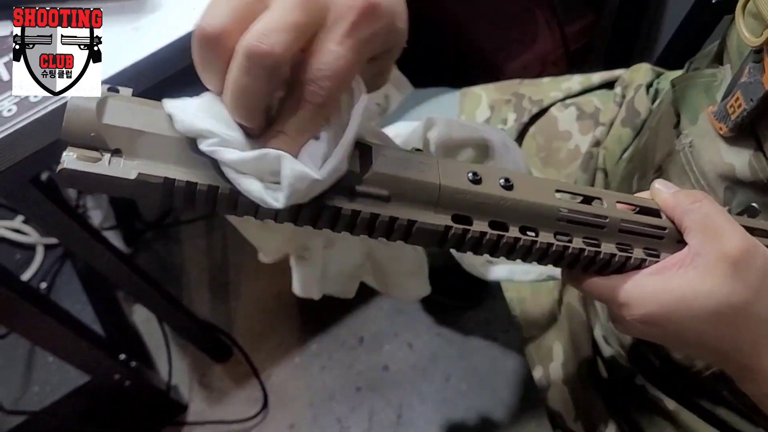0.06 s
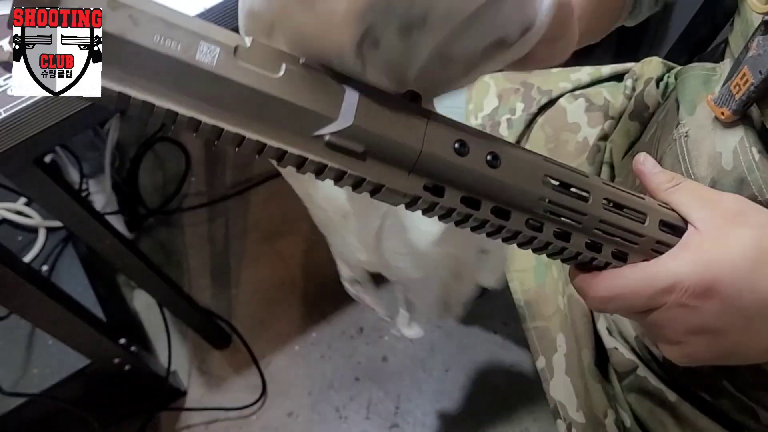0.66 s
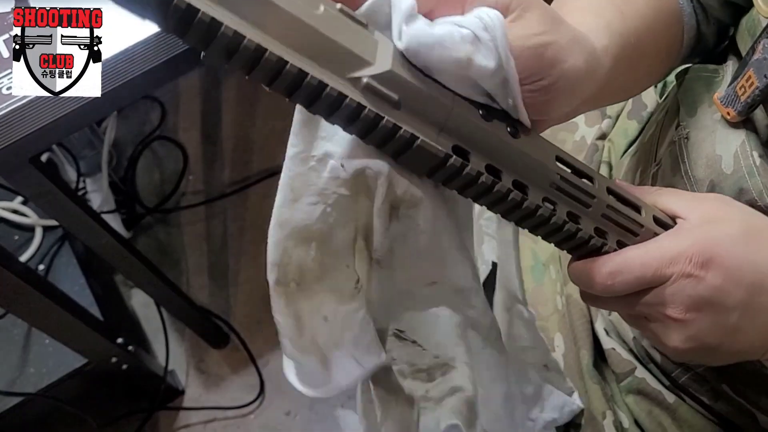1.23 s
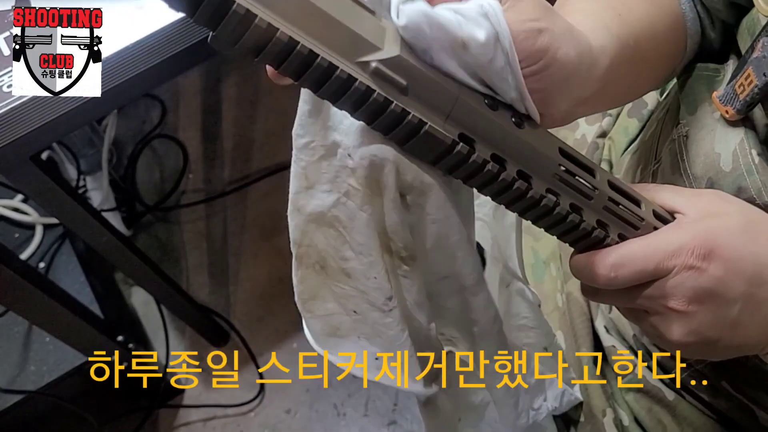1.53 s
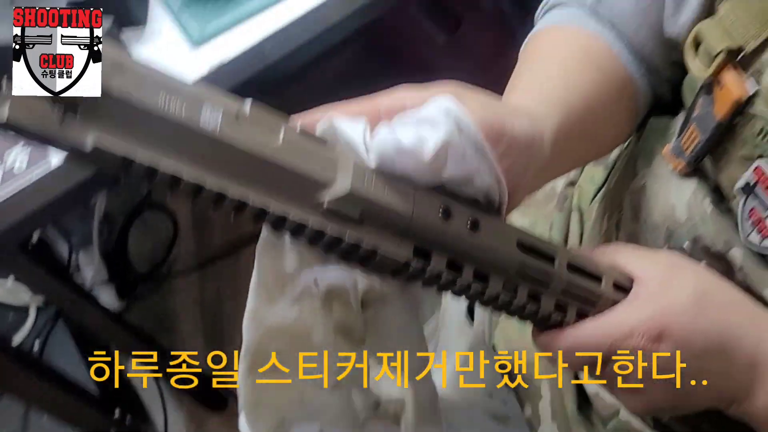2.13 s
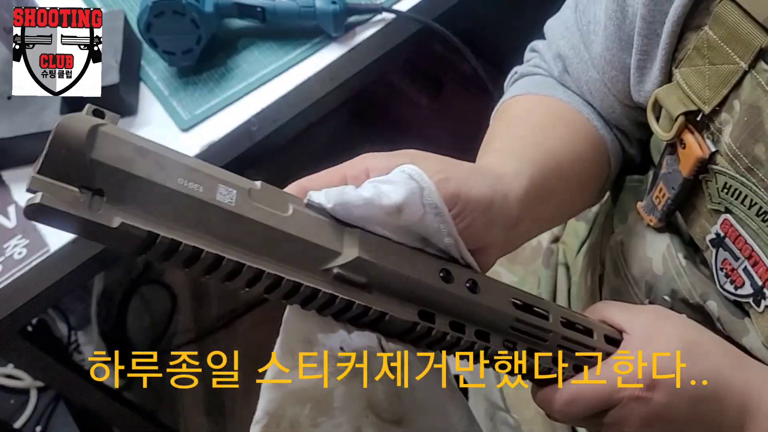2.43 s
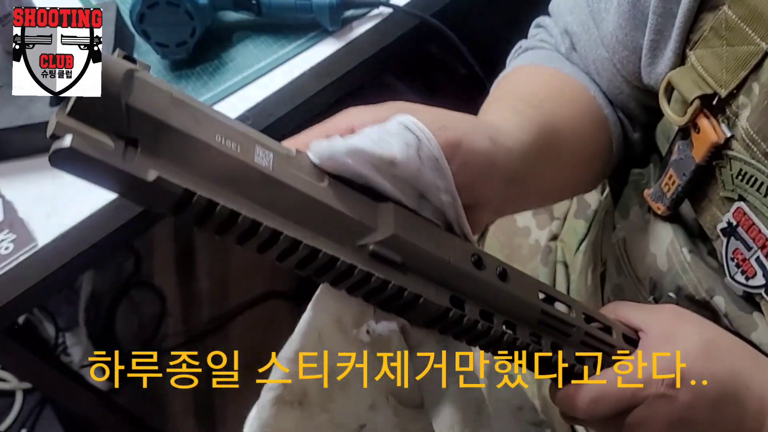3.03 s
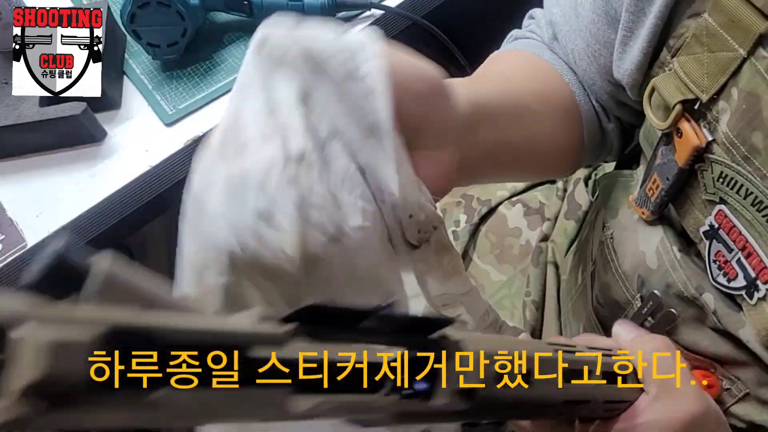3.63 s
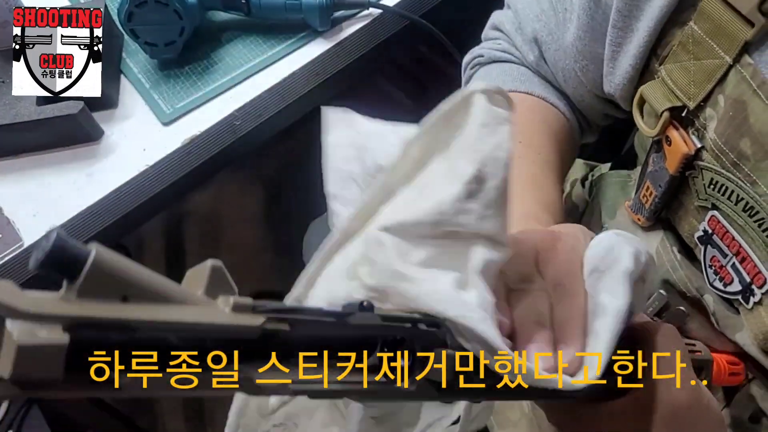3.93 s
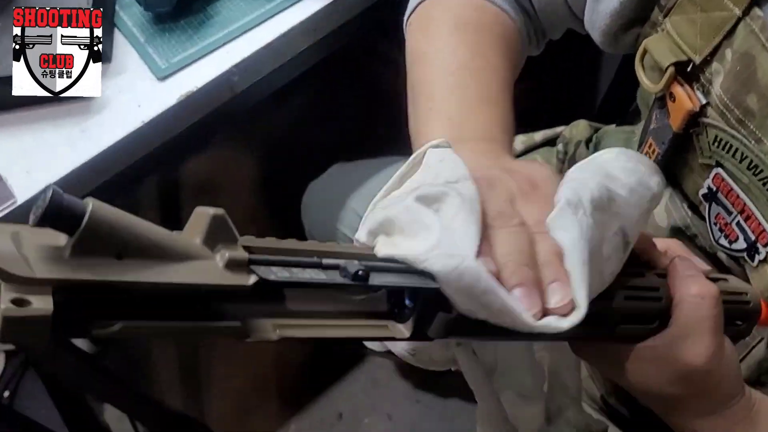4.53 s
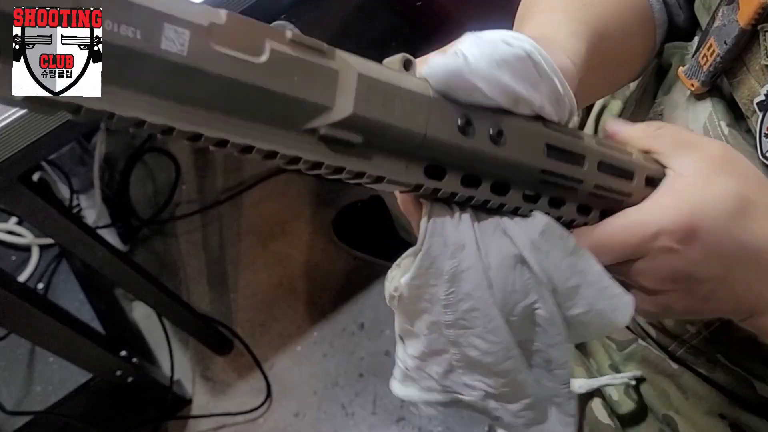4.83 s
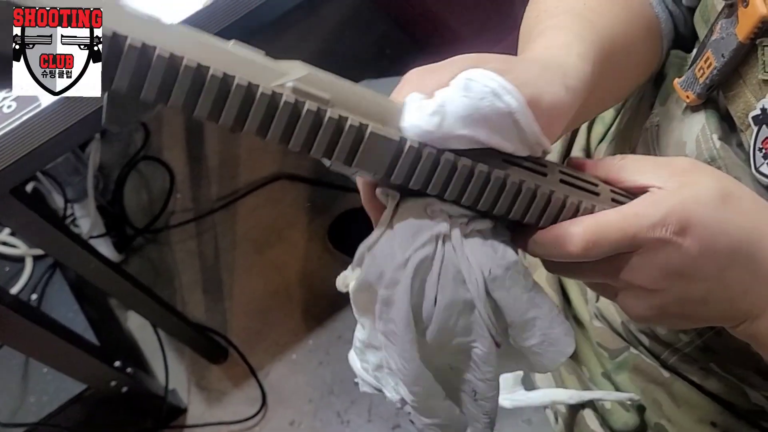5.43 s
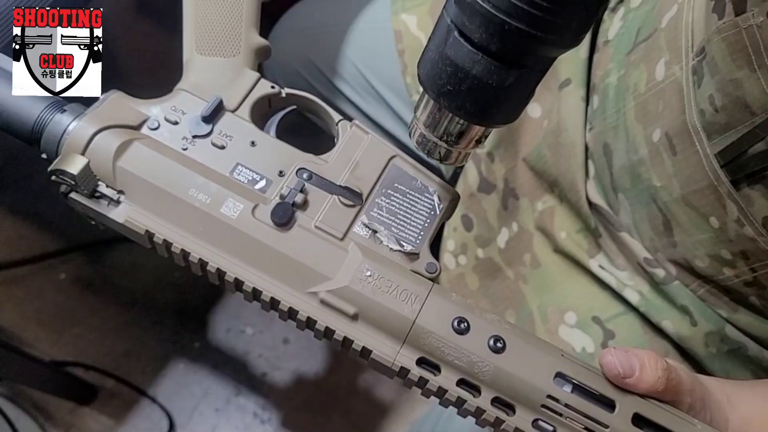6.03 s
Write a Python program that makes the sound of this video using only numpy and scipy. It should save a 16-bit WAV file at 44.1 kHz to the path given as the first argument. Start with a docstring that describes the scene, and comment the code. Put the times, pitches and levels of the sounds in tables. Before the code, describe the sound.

A cloth rubs over a metal rifle rail with clicks and knocks, then a heat gun suddenly starts blowing.

```python
"""Wiping a rifle, then a heat gun

A small, humming workshop, a stereo microphone close to the rifle. A cloth hisses along the metal
rail stroke by stroke, and its friction rings the hollow handguard near 2 kHz. Loose parts click
and knock as the rifle is turned. Then the wiping stops abruptly and a heat gun is blowing on it."""
import sys
import numpy as np
from scipy import signal
from scipy.fft import rfft, irfft, next_fast_len
from scipy.io import wavfile
from scipy.ndimage import uniform_filter1d, map_coordinates

SR = 44100
rng = np.random.default_rng(int(sys.argv[2]) if len(sys.argv) > 2 else 0)


def pcm_store(signal):
    """Save signal as 16-bit PCM."""
    levels = np.round(np.clip(np.atleast_2d(signal), -1, 1) * 32767)
    wavfile.write(sys.argv[1], SR, levels.astype(np.int16).T)


N = 276066
GUN_START_S = 5.752

# strokes of the cloth: start t/s, end t/s, hiss level/dB, scrape offset/dB, ring offset/dB
STROKES = [(0, 0.105, -46.5, -8.5, -24), (0.109, 0.208, -48, -4.5, -26), (0.211, 0.338, -46, -11, -25),
           (0.3, 0.586, -79.5, 1, -5), (0.651, 0.95, -58.5, -2, -3.5), (0.967, 1.089, -63, 0, 0),
           (1.16, 1.216, -58.5, -5, -14), (1.272, 1.354, -61.5, -4, -5), (1.395, 1.503, -63, -4, -8),
           (1.501, 1.618, -54.5, -5.5, -11), (2.269, 2.45, -54.5, -1, -19), (2.472, 2.578, -63, -2, -12),
           (2.724, 2.93, -66, 0.5, -8), (3.33, 3.571, -70, -10.5, 6), (3.566, 3.665, -64.5, 4, -7),
           (3.803, 4.057, -55.5, -8.5, -17), (4.076, 4.217, -55, -4, -22), (4.212, 4.364, -55, -7, -28),
           (4.381, 4.515, -59, -0.5, -8), (4.519, 4.644, -57.5, -7.5, -23), (4.661, 4.8, -54, -8, -15),
           (4.802, 4.928, -59, -1.5, -10), (4.924, 5.082, -60, -10, -7), (5.265, 5.564, -64, 4, -19),
           (5.497, 5.763, -55, -9.5, -36)]
# how firmly the hand works the cloth: t/s, level/dB
EFFORT = [(0.0, -70.5), (0.37, -64), (0.59, -69), (0.73, -71.5), (0.93, -65), (1.1, -65.5), (1.73, -69),
          (2.86, -69), (3.2, -65.5), (3.61, -70), (4.72, -66.5), (4.89, -64), (5.5, -67.5), (5.74, -68)]
# spectra of the cloth's hissing fibres, lower scrape and rustling folds: f/Hz, level/dB
FIBRES = [(1000, -29), (3000, -7), (5500, -1), (9000, 1.5), (12000, 0), (14500, 0.5), (16000, -0.5)]
SCRAPE = [(600, -21), (1400, -1), (2400, -5), (3400, -5), (4800, -8), (7000, -16.5), (12000, -25)]
FOLDS = [(200, -18), (400, 0), (700, 3.5), (1200, -2), (2500, -9), (6000, -19.5)]
# modes of the hollow handguard: f/Hz, level/dB, t60/s
HANDGUARD_MODES = [(2032, 1, 0.1), (2090, -37, 0.76), (1880, -8, 0.06), (2060, -18, .07),
                   (2064, -9.5, 0.12), (2260, -7, 0.038), (2580, -18, .07), (3660, -22, 0.079),
                   (5000, -25, 0.055), (7500, -23.5, .04)]
# likeness of left and right at the microphone, for rifle and room: f/Hz, correlation
NEAR_ALIKE = [(60, 0.79), (130, 0.8), (290, 0.34), (640, -0.27), (1410, -0.55), (3100, -0.063),
              (6820, -0.018), (15000, -0.01)]
# spectra of muffled handling and of the workshop's room tone: f/Hz, level/dB
HANDLING = [(60, -17), (150, 2), (300, -2.5), (500, -10), (900, -14.5), (2000, -40.5)]
ROOM_TONE = [(12, -27.5), (22, -4.5), (28, -2.5), (40, -4), (60, -5), (120, -5), (187, -22), (250, -9),
             (340, -10.5), (434, -25.5), (1300, -28), (4400, -42), (8900, -55), (16000, -64)]
# the workshop's hum above its deepest tone: f/Hz, level/dB
HUM = [(118.4, -66.5), (240.3, -64.5)]
# metal contacts: t/s, level/dB, hardness (0 is medium), rattle and knock t60/s,
# loose part's resonance f/Hz, its height/dB, ring offset/dB, knock offset/dB
CONTACTS = [(0.267, -42.5, 0.3, 0.25, 3630, 3.7, -12, -25), (0.769, -56.5, -0.53, 0.058, 2000, 11, 14, 1),
            (0.803, -55, -0.049, 0.061, 2800, 3, -15, -3), (0.86, -50.5, -0.74, 0.073, 1930, 27, -7, -1.5),
            (0.9171, -22.5, 0.71, 0.093, 2100, 19, 0.5, -24.5),
            (0.951, -40.5, 0.11, 0.099, 1250, 24, -6, -10),
            (1.5777, -31.5, -0.059, 0.04, 3830, 15, -10.5, -27),
            (2.074, -50.5, 0.71, 0.12, 10360, 18, -24, -16),
            (2.547, -34, 0.16, 0.23, 2620, 4.5, -21, -28.5), (2.558, -39, 0.83, 0.13, 8900, 18, -25, -19.5),
            (2.894, -51.5, 0.29, 0.1, 1750, 24.5, 0.5, -15), (2.972, -52, -0.23, 0.75, 4070, 9, -20, -13),
            (3.015, -24.5, -0.11, 0.27, 3700, 7.8, -17, -12), (3.028, -27, 0.2, 0.092, 1860, 9.6, -20, -9),
            (3.14, -50, -0.57, 0.38, 2350, 4, 6, -8.5), (3.288, -14, 0.86, 0.12, 10570, 9, 2.5, -29),
            (3.3039, -34.5, 0.31, 0.3, 2510, 15, -7, -31), (3.632, -67.5, -0.4, 0.04, 2070, 9.5, 12.5, -11),
            (3.822, -32.5, 0.35, 0.085, 2310, 25, -2.5, -16), (3.872, -48, -0.5, 0.045, 2260, 28, 1, -18),
            (4.162, -28, 0.28, 0.093, 4980, 9.2, -7.5, -20), (4.195, -48.5, -1, 0.095, 1250, 6, -5, -0.5),
            (4.387, -52.5, -1.3, 0.034, 1310, 31, -13, 3), (4.773, -46.5, -0.2, 0.051, 5970, 12, 1, -7),
            (4.804, -43, -0.7, 0.045, 2430, 17.5, -9, -11), (4.868, -53.5, -0.18, 0.1, 5950, 18, 5, 6.5),
            (5.277, -57, -1, 0.04, 1205, 10, 0, 3)]
# spectra of a contact's crack, rattle and dull knock: f/Hz, level/dB
CRACK = [(500, -22), (1200, 5.5), (2500, 2), (4000, -15), (6000, 1.5), (10000, 6.5), (12500, 10),
         (14500, -9), (16000, -17)]
RATTLE = [(800, -14), (1600, -1), (2700, 1.5), (3700, -0.5), (6000, -3.5), (9000, -8), (12000, -12),
          (14500, -6), (16000, -10.5)]
KNOCK = [(150, -28), (350, -3), (600, 3), (1250, -6.5), (1850, -8), (3500, -18.5)]
# reverberation of the workshop: f/Hz, t60/s
ROOM_DECAY = [(300, .3), (2500, 0.16), (7000, 0.14), (15000, 0.073)]
# spectrum of the heat gun's rushing air: f/Hz, level/dB
AIRFLOW = [(18, -45), (30, -14), (59, -11), (148, -20), (230, -12.5), (432, -17), (691, -5.5), (787, -12.5),
           (996, -8), (1510, -14.5), (1770, -4.5), (2020, -10), (2360, -13.5), (5310, -17.5), (15500, -26)]
# resonances of its barrel and fan: f/Hz, width/Hz, level/dB
BARREL = [(686, 26, 8.5), (904, 63, -2), (988, 72, -0.5), (974, 42, -3), (1744, 33, 0), (1725, 38, -4),
          (1890, 67, -15), (2380, 120, -1), (2804, 88, -3.5), (3240, 53, -3.5), (3460, 65, -5),
          (4020, 86, -11.5), (6600, 180, -15.5), (8800, 250, -14.5), (14880, 300, -20.5)]
# likeness of left and right for the heat gun: f/Hz, correlation
GUN_ALIKE = [(60, 0.63), (130, 0.9), (290, 0.69), (640, 0.19), (1410, 0.26), (3100, 0.31), (6820, -0.017),
             (15000, -0.26)]


def amp(db):
    """Decibels to gain."""
    return 10 ** (np.asarray(db) / 20)


def unit(x):
    """Scale to rms 1."""
    return x / np.sqrt(np.mean(x ** 2) + 1e-20)


def along(points, hz):
    """Read rows of f/Hz, value on a log frequency axis."""
    f, v = np.transpose(points)
    return np.interp(np.log(hz + 1), np.log(f + 1), v)


def curve(points):
    """Read rows of t/s, value at every sample."""
    return np.interp(np.arange(N) / SR, *np.transpose(points))


def wobble(rate):
    """A smooth random curve, rate knots a second."""
    return map_coordinates(rng.standard_normal(int(N * rate / SR) + 4), [np.arange(N) * rate / SR])


def filtered(x, response):
    """Filter x by a complex response of frequency."""
    size = next_fast_len(N + SR // 2)
    return irfft(rfft(x, size) * response(np.fft.rfftfreq(size, 1 / SR)), size)[..., :N]


def colour(points):
    """The response of a spectrum given as f/Hz, level/dB."""
    return lambda hz: amp(along(points, hz))


def resonances(peaks):
    """The magnitude response of peaks given as f/Hz, width/Hz, level/dB."""
    return lambda f: np.sqrt(sum(amp(2 * db) / (1 + (2 * (f - hz) / width) ** 2)
                                 for hz, width, db in peaks))


def rush(response, alike=NEAR_ALIKE):
    """Coloured stereo noise of rms 1 with a given likeness of left and right."""
    def spread(hz):
        turn = np.arccos(np.clip(along(alike, hz), -1, 1)) / 2
        return response(hz) * np.array([np.cos(turn), np.sin(turn)])
    mid, side = filtered(rng.standard_normal((2, N)), spread)
    return unit(np.array([mid + side, mid - side]))


def patchy_noise(spectrum, depth_db=2.5):
    """Noise whose colour shifts at random, in patches about 700 Hz wide and 70 ms long."""
    bins = signal.stft(rush(colour(spectrum)), nperseg=512)[2]
    patches = uniform_filter1d(rng.standard_normal(bins.shape[1:]), size=8, axis=0)
    patches = uniform_filter1d(patches, size=12, axis=1)
    return unit(signal.istft(bins * amp(depth_db * unit(patches)), nperseg=512)[1][:, :N])


def fade(t, t60):
    """Exponential decay by 60 dB in t60 seconds."""
    return np.exp(-np.log(1000) * t / t60)


def add(track, start, sound):
    """Mix a sound into a track, start seconds in."""
    part = track[..., round(start * SR):][..., :sound.shape[-1]]
    part += sound[..., :part.shape[-1]]


def cloth(arch=0.53, effort_contrast=1.6, held_width_hz=70):
    """Close up, fibres slide and catch on the rail, folds rustle and friction rings the handguard."""
    effort_db = curve(EFFORT)
    effort = amp(effort_db.mean() + effort_contrast * (effort_db - effort_db.mean()))
    sliding, pressing, singing = np.zeros((3, N))
    for start, end, db, scrape_db, ring_db in STROKES:
        # the hand speeds up and slows down again within each stroke
        speed = np.abs(np.sin(np.linspace(0, np.pi, round((end - start) * SR)))) ** arch
        add(sliding, start, amp(db) * speed)
        add(pressing, start, amp(db + scrape_db) * speed)
        add(singing, start, amp(db + ring_db) * speed)
    brushing = amp(-6.5) * effort  # the cloth never quite leaves the metal
    hiss = np.hypot(sliding, brushing) * patchy_noise(FIBRES)
    scrape = np.hypot(amp(-2) * pressing, brushing) * patchy_noise(SCRAPE)
    catches = unit(amp(0.5 * wobble(350) + 0.96 * wobble(35)))
    # folds and handguard both answer the steady effort and each stroke
    folding = np.hypot(amp(2) * effort, amp(-9) * pressing)
    ringing = np.hypot(amp(-9) * effort, singing)
    rustle = folding * unit(amp(2 * wobble(40))) * patchy_noise(FOLDS)
    # the gripping hand damps the modes and widens them
    held = resonances([(hz, held_width_hz, db) for hz, db, _ in HANDGUARD_MODES])
    ring = ringing * unit(amp(2.2 * wobble(45))) * rush(held)
    return catches * (hiss + scrape) + rustle + ring


def handling(above_effort_db=8):
    """Muffled handling of the rifle follows the effort of the hand."""
    return amp(curve(EFFORT) + above_effort_db) * rush(colour(HANDLING))


def workshop(room_tone_db=-54.5, deep_hz=68.2, deep_db=-56.5, drift_rad=0.4):
    """Low room tone all round the microphone, with a hum whose tones waver."""
    def tone(hz):
        return np.sqrt(2) * np.sin(2 * np.pi * hz * np.arange(N) / SR + drift_rad * wobble(7.6))
    upper_hum = sum(amp(db + 2.7 * wobble(6)) * tone(hz) for hz, db in HUM)
    deep_hum = amp(deep_db + 3.5 * wobble(8)) * tone(deep_hz)
    return amp(room_tone_db) * rush(colour(ROOM_TONE)) + upper_hum + deep_hum


def contacts(rise_s=0.00046, crack_t60=0.011, hard_crack_db=10.5, hard_db_per_octave=7.5):
    """Metal meets metal: a sharp crack, a dying rattle, a dull knock and the handguard's ring."""
    t = np.arange(SR // 2) / SR
    f = np.fft.rfftfreq(len(t), 1 / SR)
    octaves = np.log2(np.maximum(f, 1500) / 4000)

    def burst(gain, t60):
        spectrum = rfft(rng.standard_normal((2, len(t)))) * gain
        return fade(t, t60) * unit(irfft(spectrum, len(t)))

    cracks, bodies, rings = np.zeros((3, 2, N))
    for start, db, hardness, t60, part_hz, part_db, ring_db, knock_db in CONTACTS:
        blow = amp(db) * (1 - np.exp(-t / rise_s))
        # crowded short-lived modes give every blow its own ragged colour
        ragged = amp(3 * map_coordinates(rng.standard_normal(200), [f / 160], order=1))
        # the loose part has one hollow resonance, 8.7 % wide
        hollow = 1 + (amp(part_db) - 1) / (1 + ((f / part_hz - 1) * 2 / 0.087) ** 2)
        # a harder contact cracks louder and rattles brighter
        crack = amp(hard_crack_db * hardness) * burst(colour(CRACK)(f) * ragged, crack_t60)[0]
        tilt = amp(hard_db_per_octave * hardness * octaves)
        rattle = amp(1) * burst(colour(RATTLE)(f) * hollow * tilt * ragged, t60)
        knock = amp(knock_db + 2) * burst(colour(KNOCK)(f) * ragged, t60)
        add(cracks, start, blow * crack)
        add(bodies, start, blow * (rattle + knock))
        add(rings, start, blow * amp(ring_db + 3) * handguard_ring(t))
    # loose parts chatter against each other and roughen the ring
    chatter = unit(amp(0.5 * wobble(600)))
    buzz = unit(amp(wobble(260)))
    return at_microphone(cracks, lead_ms=0.029) + at_microphone(buzz * rings, 0.19) + chatter * bodies


def handguard_ring(t, scatter_db=1.6):
    """Every blow lands elsewhere and shares its energy anew among the handguard's modes."""
    ring = np.zeros(len(t))
    for hz, db, t60 in HANDGUARD_MODES:
        envelope = amp(db + rng.normal(0, scatter_db)) * fade(t, t60)
        ring += envelope * np.sin(2 * np.pi * (hz * t + rng.random()))
    return ring


def at_microphone(x, lead_ms):
    """A close source reaches the left microphone port first."""
    shift_s = np.array([[0.5], [-0.5]]) * lead_ms / 1000
    return filtered(x, lambda hz: np.exp(2j * np.pi * hz * shift_s))


def walls(x, level_db=-17, build_s=0.0058):
    """The small room answers; its treble dies first."""
    hz, t, bins = signal.stft(rng.standard_normal((2, SR // 2)), SR, nperseg=256)
    decay = amp(-60 * t / along(ROOM_DECAY, hz)[:, None])
    tail = signal.istft(bins * decay, SR, nperseg=256)[1]
    tail *= np.clip(np.arange(tail.shape[1]) / SR / build_s, 0, 1)
    return amp(level_db) * signal.fftconvolve(x, tail / np.linalg.norm(tail[0]), axes=1)[:, :N]


def heat_gun(start_db=-32, swell_db_per_s=5, onset_s=0.021, low_cut_hz=400):
    """Fan-driven air rushes through the barrel and sounds its resonances, growing slowly louder."""
    running_s = np.arange(N) / SR - GUN_START_S
    envelope = np.clip(running_s / onset_s, 0, 1) * amp(start_db + swell_db_per_s * running_s)
    air = rush(colour(AIRFLOW), GUN_ALIKE)
    barrel = rush(lambda hz: resonances(BARREL)(hz) * hz ** 2 / (hz ** 2 + low_cut_hz ** 2), GUN_ALIKE)
    return envelope * amp(-3) * (air + barrel)  # half the power each


def scene():
    """Wiping and clicks at close range until the heat gun takes over; the room hums throughout."""
    before_gun = np.arange(N) / SR < GUN_START_S
    wiping = before_gun * (cloth() + handling())
    clicks = contacts()
    return wiping + clicks + walls(clicks) + heat_gun() + workshop()


def record(dry, ceiling=0.85, top_hz=15750):
    """The recorder rounds off the highest peaks and keeps nothing above its band limit."""
    rounded = dry / (1 + np.abs(dry / ceiling) ** 4) ** (1 / 4)
    return filtered(rounded, lambda hz: np.clip((top_hz - hz) / 600 + 0.5, 0, 1))


dry = scene()
out = record(dry)
pcm_store(out)
```